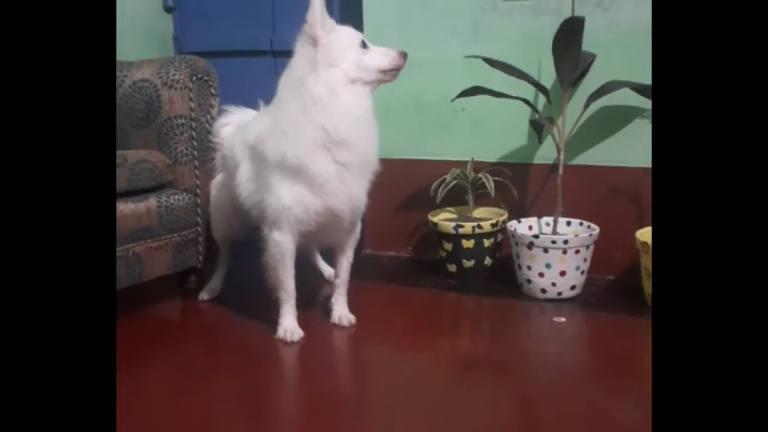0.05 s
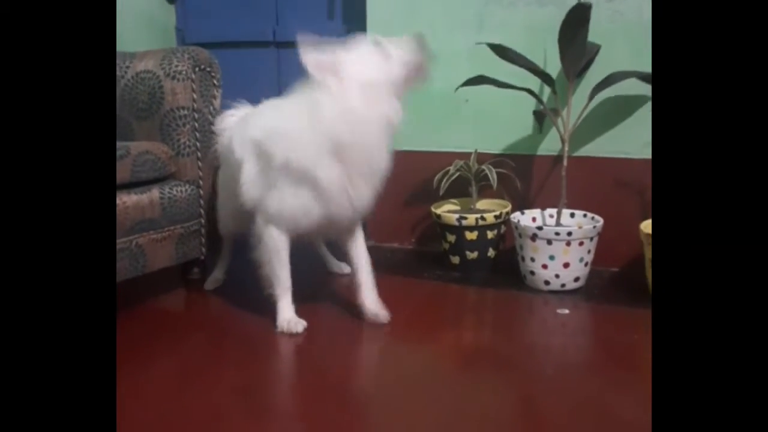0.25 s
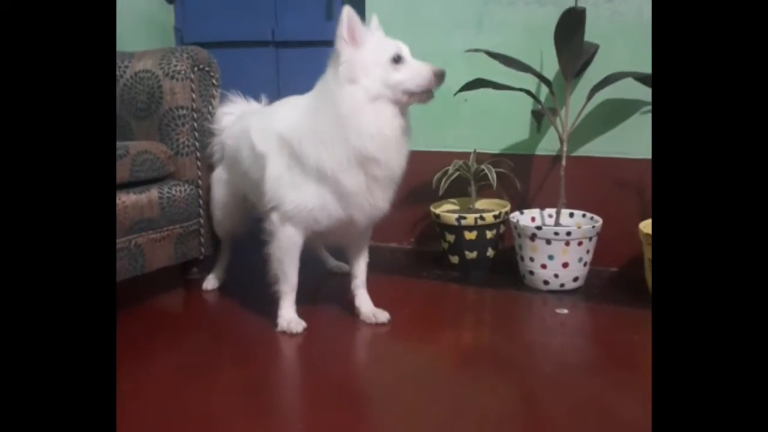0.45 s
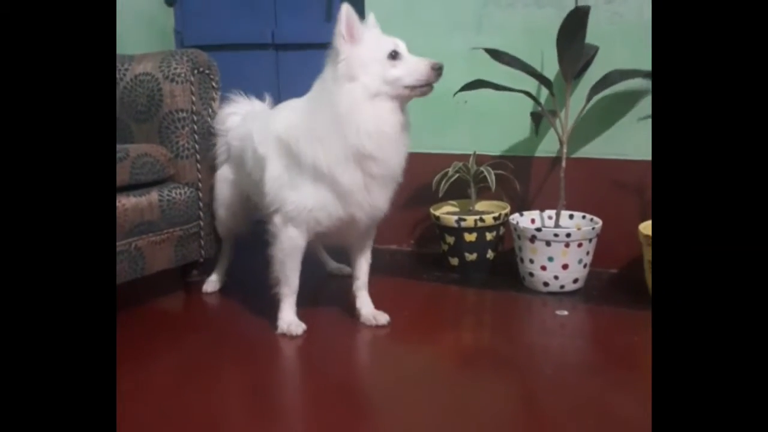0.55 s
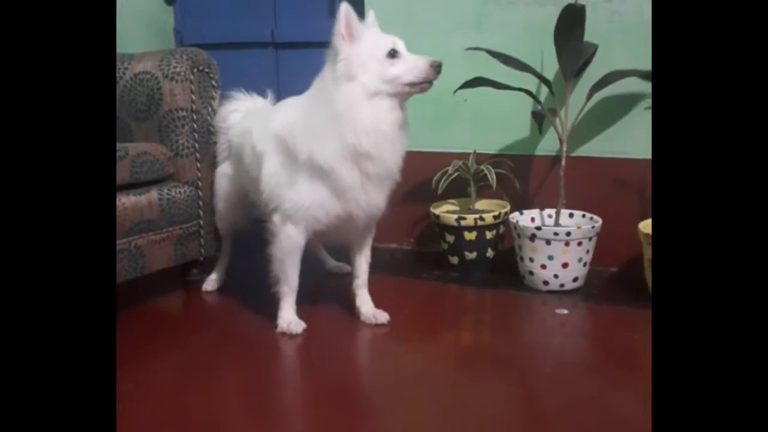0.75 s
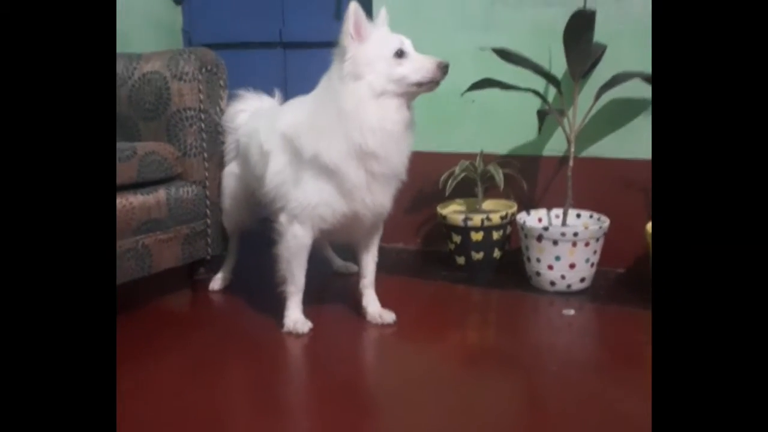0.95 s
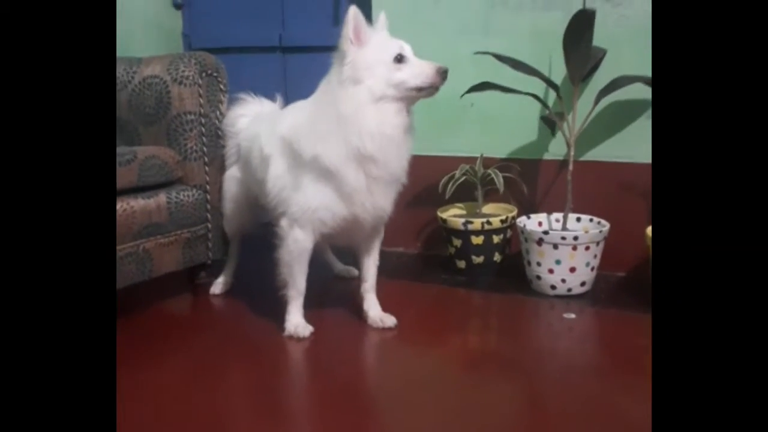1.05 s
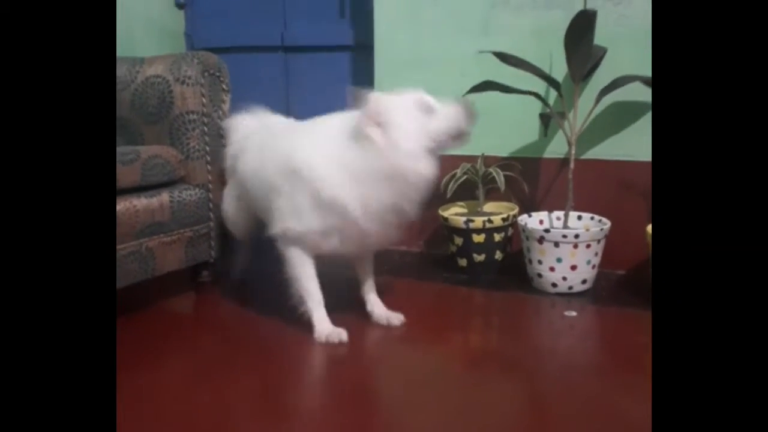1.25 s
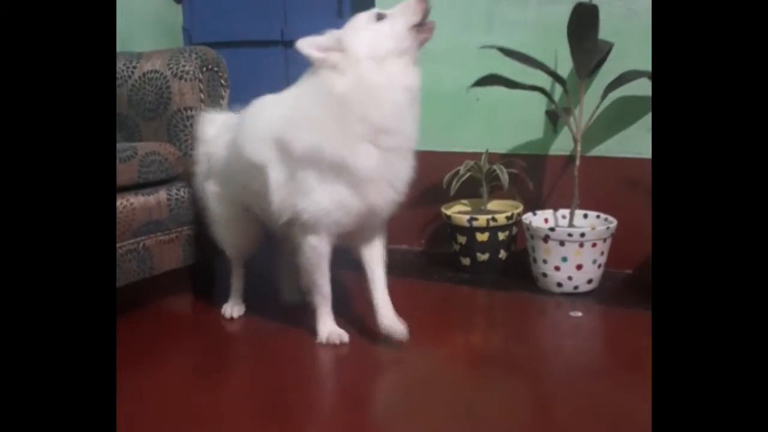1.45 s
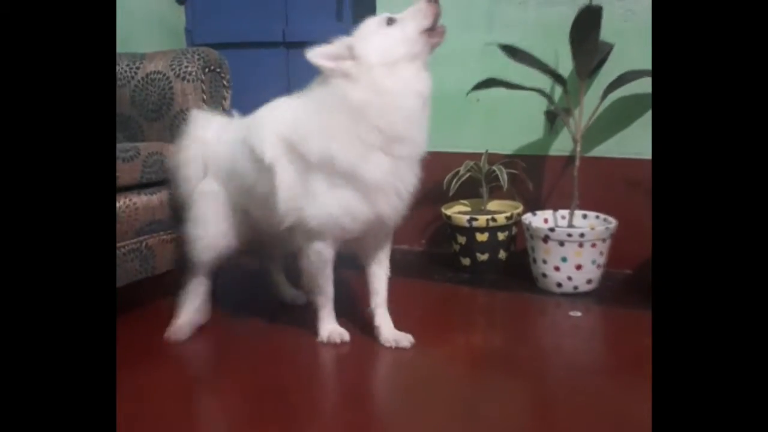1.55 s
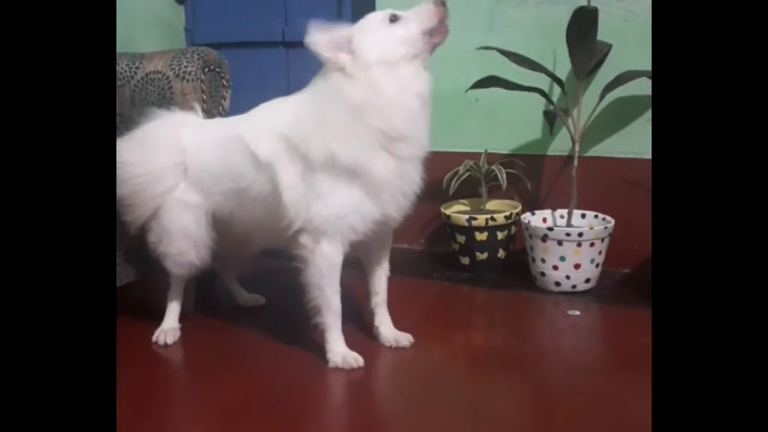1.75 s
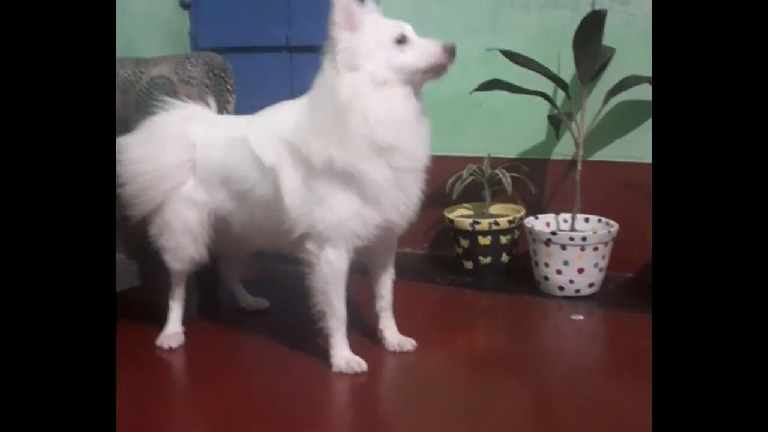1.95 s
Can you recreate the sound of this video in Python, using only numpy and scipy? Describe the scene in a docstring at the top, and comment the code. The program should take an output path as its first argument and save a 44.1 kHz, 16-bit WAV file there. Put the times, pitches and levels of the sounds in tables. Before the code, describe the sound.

Indoors, a dog barks once, then after a short gap barks again, stretching it into a descending howl and low growl; short room echo, faint room noise, light low bumps on the handheld microphone, dog almost entirely on the left.

```python
"""A small dog in a hard-floored room barks once, then barks again and draws it out into a falling howl.
The howl ends in a growl, and a brief grumble comes before each bark. Vocal fold pulses and noise puffs
are coloured by throat, mouth and treble resonances; the growls are slow uneven flaps in the chest.
Nearly all the dog and room sound reaches the left microphone port. Soft bumps, short low sines that swell and
fade, probably from the hand that holds the recorder, fall mostly on the right, over noise rumble and hiss."""
import sys
import numpy as np
from scipy import signal
from scipy.fft import rfft, irfft, next_fast_len
from scipy.io import wavfile
from scipy.ndimage import uniform_filter1d, minimum_filter1d, map_coordinates

SR = 44100
rng = np.random.default_rng(int(sys.argv[2]) if len(sys.argv) > 2 else 0)


def file_out(sig):
    """Save sig as 16-bit WAV at sys.argv[1]."""
    # one column per channel
    cols = np.atleast_2d(sig).T
    # limit, then scale
    lim = np.clip(cols, -1, 1)
    pcm = np.round(lim * 32767).astype(np.int16)
    wavfile.write(sys.argv[1], SR, pcm)


N = 88200
TOP_HZ = 15800  # band limit of the voice harmonics and of the output


def amp(db):
    """Decibels to gain."""
    return 10 ** (np.asarray(db) / 20)


def unit(x):
    """Scaled to rms 1."""
    return x / np.sqrt(np.mean(x ** 2) + 1e-20)


def along(points, hz):
    """(f/Hz, value) points read on a log frequency axis."""
    f, v = np.transpose(points)
    return np.interp(np.log(hz + 1), np.log(f + 1), v)


def curves(rows):
    """One value per sample for each column after the time."""
    s, *cols = np.transpose(rows)
    return [np.interp(np.arange(N) / SR, s, c) for c in cols]


def wobble(rate):
    """A smooth random curve with this many knots a second."""
    knots = rng.standard_normal(4096)
    return map_coordinates(knots, [np.arange(N) * rate / SR], mode="wrap")


def filtered(x, response):
    """x shaped by a gain that depends on frequency."""
    m = next_fast_len(N + SR // 2)
    spectrum = rfft(x, m) * response(np.fft.rfftfreq(m, 1 / SR))
    return irfft(spectrum, m)[..., :N]


def coloured(x, points):
    """x through a (f/Hz, level/dB) colour, at rms 1."""
    return unit(filtered(x, lambda hz: amp(along(points, hz))))


def even(x):
    """x held near a running rms of 1, so that only its colour and fine grain remain."""
    size = int(0.031 * SR)  # averaging window, 31 ms, passed twice
    power = uniform_filter1d(uniform_filter1d(x * x, size), size)
    return x / np.sqrt(np.abs(power) + 1e-9)


def gate(start, end, edge):
    """Close to 1 from start to end, with soft edges (all in seconds)."""
    t = np.arange(N) / SR
    opening = (1 + np.tanh(2 * (t - start) / edge)) / 2
    closing = (1 - np.tanh(2 * (t - end) / edge)) / 2
    return opening * closing


def hiss():
    """Steady filtered noise, independent on the two ports."""
    # hiss colour before scaling to rms 1: f/Hz, level/dB
    hiss_colour = [(100, 21), (500, 12), (3000, -3), (8000, -38), (14000, -5)]
    return amp(-77.5) * coloured(rng.standard_normal((2, N)), hiss_colour)


def rumble():
    """Low filtered noise, independent on the two ports, with a slowly moving level."""
    # rumble colour before scaling to rms 1: f/Hz, level/dB
    rumble_colour = [(20, -28), (50, 4.5), (120, 2.5), (400, -49)]
    # rumble loudness: t/s, level/dB
    rumble_level = [(0, -57), (.5, -67.5), (1.78, -62), (1.84, -52.5)]
    level = amp(curves(rumble_level)[0])
    return level * coloured(rng.standard_normal((2, N)), rumble_colour)


def room_air():
    """Room noise: one band of filtered noise with a slowly moving level."""
    # room noise colour before scaling to rms 1: f/Hz, level/dB
    air_colour = [(140, -14), (250, 0.5), (400, 0.5), (1000, -0.5), (2000, -6), (4000, -16), (6000, -23.5),
                  (8000, -31), (8700, -18.5), (11000, -25.5), (15500, -33)]
    # room noise loudness: t/s, level/dB
    air_level = [(.2, -43.5), (.45, -49.5), (.95, -50.5), (1.08, -48), (1.7, -46.5), (1.9, -47), (2, -48)]
    return amp(curves(air_level)[0]) * coloured(rng.standard_normal(N), air_colour)


def bumps():
    """Each bump is a low sine under a short bell-shaped swell, mostly on one port."""
    # bumps on the recorder: t/s, f/Hz, half length/s, level of both ports together/dB, right over left/dB
    bump_list = [(0.177, 78, 0.0052, -30.5, 28), (0.207, 96, 0.02, -37, 15), (0.24, 108, 0.0026, -30, -27),
                 (0.874, 102, 0.007, -23.5, 52), (0.987, 74.5, 0.0085, -35.5, 20),
                 (1.2, 64.4, 0.0088, -38.5, 25)]
    out, t = np.zeros((2, N)), np.arange(N) / SR
    for s, hz, width, db, right_db in bump_list:
        ports = np.array([[1], [amp(right_db)]]) / np.hypot(1, amp(right_db))
        swell = np.exp(-((t - s) / width) ** 2)
        out += ports * amp(db) * np.sin(2 * np.pi * hz * (t - s)) * swell
    return out


def room(x):
    """The walls' answer: a noise tail whose decay time depends on frequency."""
    # reverberation: f/Hz, time to fall by 60 dB/s
    decay_time = [(200, 0.15), (700, 0.27), (1500, 0.23), (4000, 0.26), (12000, 0.27)]
    hz, t, z = signal.stft(rng.standard_normal(SR // 2), SR, nperseg=256)
    decay = amp(-60 * t / along(decay_time, hz)[:, None])
    tail = signal.istft(z * decay, SR, nperseg=256)[1]
    delayed = np.pad(x, (SR // 250, 0))  # the tail sets in 4 ms after the direct sound
    return signal.fftconvolve(delayed, tail / np.linalg.norm(tail))[:N]


def grumbles():
    """Slack folds flap slowly and unevenly into the chest."""
    # low grumbles: t/s, length/s, level/dB
    grumble_list = [(0.176, 0.077, -38), (1.085, 0.22, -43), (1.782, 0.077, -32.5)]
    # chest colour before levelling: f/Hz, level/dB
    chest = [(130, -18), (240, -11), (390, -2), (520, -6.5), (780, -16), (960, -14.5), (1300, -73),
             (8000, -76)]
    flaps_per_s, edge_s = 200, 0.021
    cycles = np.floor(np.cumsum(flaps_per_s * (1 + 0.22 * wobble(90))) / SR)
    clicks = np.diff(cycles, prepend=0) * amp(0.73 * wobble(120))  # one click for each new cycle
    flaps = unit(clicks) + 0.5 * rng.standard_normal(N)
    level = sum(amp(db) * gate(s, s + length, edge_s) for s, length, db in grumble_list)
    return even(coloured(flaps, chest)) * level


def folds(phase, hz, rough, half):
    """Vocal fold pulses: with strain they alternate strong and weak and let through puffs of noise."""
    clean_tilt_db = -10  # a clean voice is this much weaker above its second harmonic
    half_swing = 0.15  # slow swing of the folds at half pitch
    puff_low_hz = 458  # the puffs carry little below this
    shimmer_db, shimmer_per_s = 6, 200  # level unsteadiness of a fully rough voice
    tilt_db = clean_tilt_db * np.exp(-half / 1.07)
    harmonics = np.zeros(N)
    for k in range(1, 30):
        level = amp(tilt_db * (k > 2)) * (k * hz < TOP_HZ)
        harmonics += level * np.cos(k * phase - k * k * np.pi / 4)
    swing = np.cos(phase / 2)
    pulses = 0.25 * harmonics * (1 + half * swing) + half_swing * half ** 2 * swing
    breath = rng.standard_normal(N) * (1 + np.cos(phase))  # noise swells once a cycle
    puffs = unit(filtered(breath, lambda f: f * f / np.hypot(f * f, puff_low_hz ** 2)))
    shimmer = amp(shimmer_db * rough * wobble(shimmer_per_s))
    return (np.sqrt(1 - rough) * pulses + np.sqrt(rough) * puffs) * shimmer


def moving_band(x, hz, width_hz):
    """x through a resonance whose centre follows hz: shifted down, low-passed and shifted back."""
    turn = np.exp(2j * np.pi * np.cumsum(hz) / SR)

    def low(v):
        return filtered(v, lambda f: 1 / (1 + (2 * f / width_hz) ** 2) ** 2)

    return unit(low(x * turn.real) * turn.real + low(x * turn.imag) * turn.imag)


def airy(source, colour):
    """Fold sound and steady air through one colour; the treble flickers."""
    air_share = 0.26  # share of air in the power
    flicker_db, flicker_per_s = 2, 70
    voiced = np.sqrt(1 - air_share) * even(colour(source))
    air = np.sqrt(air_share) * colour(rng.standard_normal(N))
    return (voiced + air) * amp(flicker_db * wobble(flicker_per_s))


def upper_voice(source, treble):
    """The treble of the voice: plain overtones, a moving ring and an airy sheen."""
    # overtone colour before levelling: f/Hz, level/dB
    overtone_colour = [(1150, -66), (1550, -6.5), (2000, 7.5), (3000, -2), (3800, -55)]
    # sheen colour before levelling: f/Hz, level/dB
    sheen_colour = [(2500, -39), (4600, -12), (6350, -9.5), (6950, -12), (8150, 6.5), (9500, -2.5),
                    (10100, -4.5), (11000, -7.5), (11800, 2), (14000, -15.5)]
    overtone_db, ring_hz, ring_db, sheen_db = curves(treble)
    ring = airy(source, lambda x: moving_band(x, ring_hz, width_hz=320))
    sheen = airy(source, lambda x: coloured(x, sheen_colour))
    overtones = even(coloured(source, overtone_colour))
    return amp(overtone_db) * overtones + amp(ring_db) * ring + amp(sheen_db) * sheen


def call(voice, effort, treble):
    """Folds sound through throat and mouth; rasp grows as the voice cracks to half pitch, low notes hum."""
    # throat resonance before levelling: f/Hz, level/dB
    throat_colour = [(150, -49), (250, -23), (335, -9.5), (430, -0.5), (540, 4), (680, -2), (780, -2),
                     (900, -4.5), (1500, -76)]
    # mouth resonances before levelling: f/Hz, level/dB
    mouth_colour = [(500, -38), (820, 2.5), (955, 13.5), (1130, 3), (1350, 1.5), (1520, -6.5), (1680, -8),
                    (2050, -32), (2700, -46.5), (5000, -78)]
    # rasp colour before levelling: f/Hz, level/dB
    rasp_colour = [(1200, -31), (3000, 4), (4900, 3), (5450, -7), (6050, 3.5), (6800, -8.5), (8700, -4),
                   (15500, -16)]
    throat_db, mouth_offset_db, rasp_db = 5.5, 2.5, -19.5  # balance under the effort curve
    jitter_clean, jitter_rough, jitter_per_s = 0.00616, 0.0553, 260  # pitch unsteadiness, share of pitch
    hum_below_hz = 400  # the chest takes up notes below this
    release_s = 0.0082

    hz, rough, half = curves(voice)
    rough, half = np.clip(rough, 0, 1), np.clip(half, 0, 1)
    level_db, mouth_db = curves(effort)
    jitter = (jitter_clean + jitter_rough * rough) * wobble(jitter_per_s)
    phase = 2 * np.pi * np.cumsum(hz * (1 + jitter)) / SR
    source = folds(phase, hz, rough, half)

    throat = amp(throat_db) * even(coloured(source, throat_colour))
    mouth = amp(mouth_offset_db + mouth_db) * even(coloured(source, mouth_colour))
    hum = np.sqrt(2) * np.cos(phase) / (1 + (hz / hum_below_hz) ** 10)
    rasp_level = amp(rasp_db) * np.hypot(1, amp(mouth_db)) * half
    rasp = rasp_level * even(coloured(source, rasp_colour))
    sound = amp(level_db) * (throat + mouth + hum + rasp) + upper_voice(source, treble)
    return gate(effort[0][0], effort[-1][0], release_s) * sound


def bark():
    """The single bark: a short strained call whose pitch rises, falls and turns up again at the end."""
    # folds: t/s, pitch f/Hz, roughness 0-1, half-pitch share 0-1
    bark_voice = [(.232, 573.1, 0.24, 0.57), (.246, 612.6, 0.28, 0.39), (.264, 683.4, 0.24, 0.17),
                  (.292, 638.3, 0.2, 0.45), (.328, 565.8, 0.43, 0.69), (.355, 545.2, 0.23, 0.35),
                  (.376, 657, 0.34, 0.23)]
    # loudness before the throat and mouth balance: t/s, level/dB, mouth over throat/dB
    bark_effort = [(.228, -40.5, -2), (.24, -17, -4.5), (.262, -14.5, -1), (.293, -22.5, 5),
                   (.335, -24, -1), (.365, -29.5, -8), (.385, -39.5, 0.5), (.476, -53.5, 0)]
    # treble: t/s, overtone level/dB, ring f/Hz, ring level/dB, sheen level/dB
    bark_treble = [(.235, -54, 3440, -47, -50), (.29, -53, 4670, -47.5, -47), (.325, -50, 3740, -47, -52),
                   (.476, -72, 3880, -93, -88)]
    return call(bark_voice, bark_effort, bark_treble)


def howl():
    """The second bark, drawn out into a clearer howl whose pitch falls."""
    # folds: t/s, pitch f/Hz, roughness 0-1, half-pitch share 0-1
    howl_voice = [(1.16, 522.7, 0.15, 0.02), (1.2, 533, 0.21, 0.22), (1.22, 677.6, 0.13, 0.55),
                  (1.265, 656.2, 0.12, 0.78), (1.29, 589.6, 0.095, 0), (1.318, 613.8, 0.04, 0.17),
                  (1.336, 667.4, 0.0066, 0.017), (1.385, 663.6, 0.0021, 0), (1.435, 628, 0.0035, 0.089),
                  (1.5, 548.2, 0.015, 0), (1.58, 525.1, 0.0028, 0), (1.716, 463.2, 0.016, 0),
                  (1.736, 399.3, 0.12, 0), (1.778, 235, .08, 0.025)]
    # loudness before the throat and mouth balance: t/s, level/dB, mouth over throat/dB
    howl_effort = [(1.163, -49.5, 25), (1.184, -30, 19.5), (1.21, -23, 4.5), (1.255, -17.5, 3),
                   (1.305, -26.5, 8), (1.332, -15, -9), (1.37, -20.5, -18), (1.384, -70, -4),
                   (1.402, -17, -23), (1.445, -21.5, -20.5), (1.51, -30.5, -6.5), (1.54, -23, -11.5),
                   (1.585, -22, -4.5), (1.615, -29, 5.5), (1.657, -33, -2), (1.697, -30, -1),
                   (1.724, -29, -2.5), (1.75, -39, -6.5), (1.8, -41.5, -7)]
    # treble: t/s, overtone level/dB, ring f/Hz, ring level/dB, sheen level/dB
    howl_treble = [(1.163, -51, 4740, -62, -49.5), (1.21, -37.5, 4850, -42, -41),
                   (1.255, -38, 4000, -39, -45), (1.335, -53, 3780, -49, -48.5),
                   (1.44, -59.5, 3720, -55, -49.5), (1.63, -56, 3780, -87, -53.5),
                   (1.8, -70, 3788, -87, -65)]
    return call(howl_voice, howl_effort, howl_treble)


def scene():
    """Dog and room noise on the left port, a trace on the right; bumps, rumble and hiss on both."""
    room_db, right_port_db = -4, -53
    dog = bark() + howl() + grumbles()
    sound = dog + amp(room_db) * room(dog) + room_air()
    ports = np.array([sound, amp(right_port_db) * sound])
    return ports + bumps() + rumble() + hiss()


def record(dry):
    """A look-ahead limiter holds down the highest peaks; nothing is kept above the band limit."""
    ceiling, look_s = 0.95, 0.0076  # peak level where limiting starts, look-ahead in seconds
    size = int(look_s * SR)
    needed = ceiling / np.maximum(np.abs(dry).max(axis=0), ceiling)
    held = minimum_filter1d(needed, 2 * size)
    gain = uniform_filter1d(uniform_filter1d(held, size), size)
    return filtered(dry * gain, lambda hz: hz < TOP_HZ)


dry = scene()
out = record(dry)
file_out(out)
```